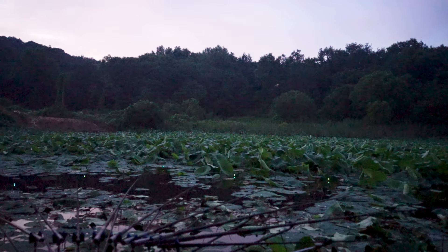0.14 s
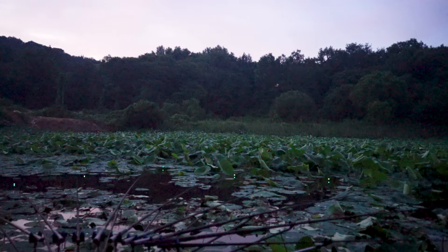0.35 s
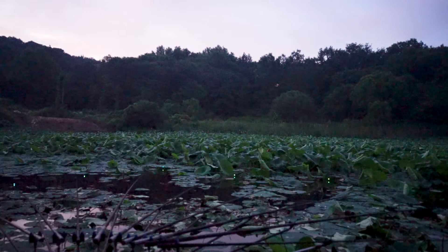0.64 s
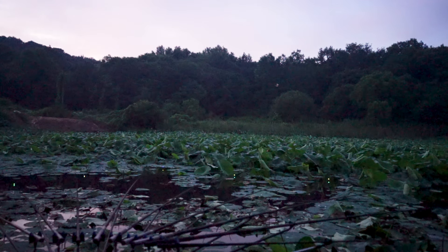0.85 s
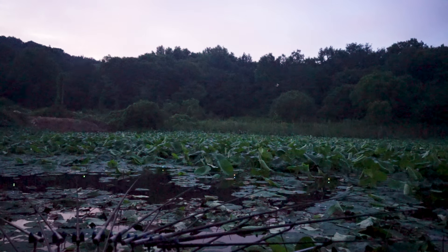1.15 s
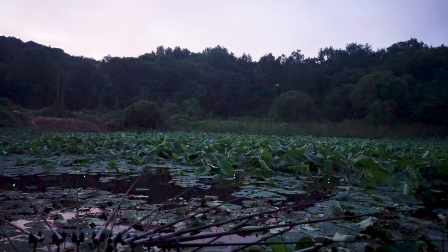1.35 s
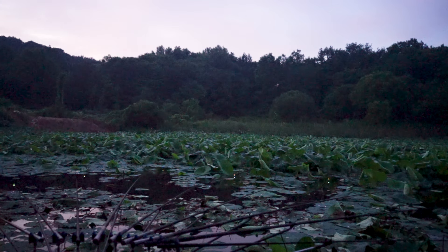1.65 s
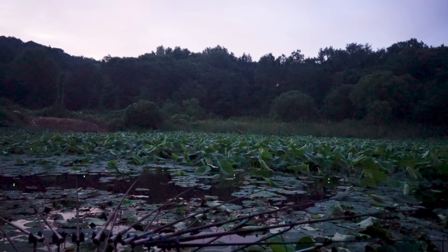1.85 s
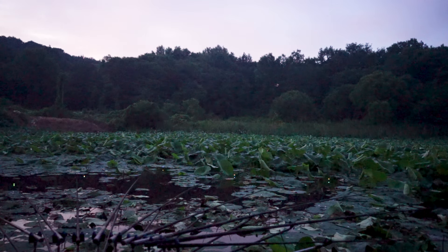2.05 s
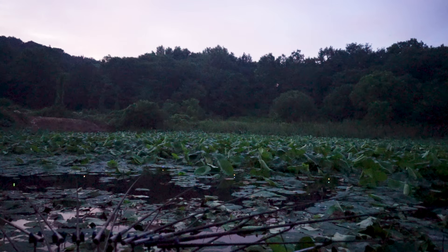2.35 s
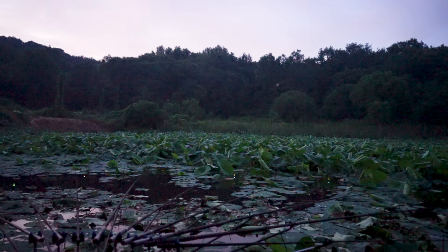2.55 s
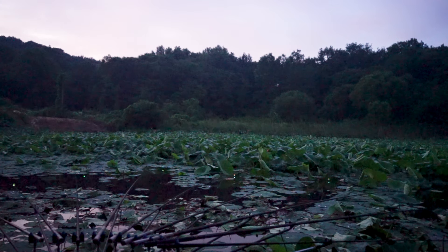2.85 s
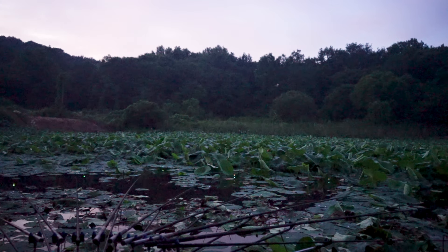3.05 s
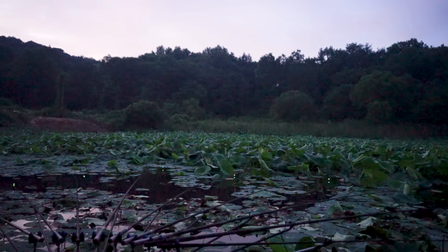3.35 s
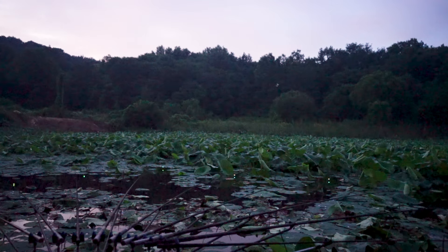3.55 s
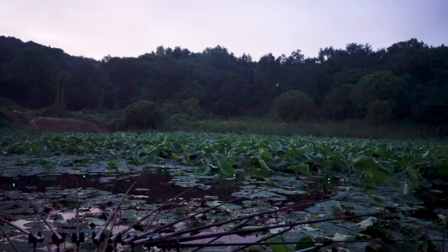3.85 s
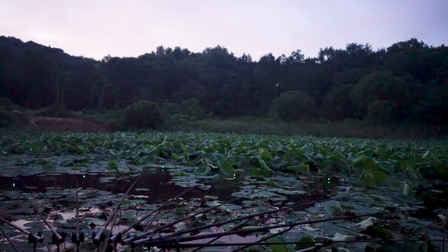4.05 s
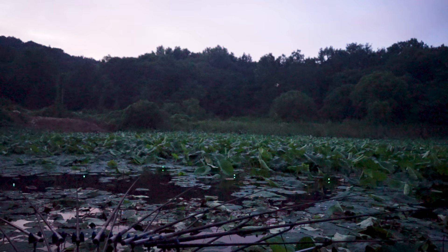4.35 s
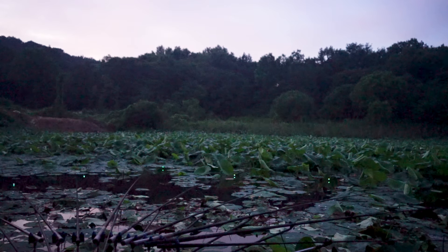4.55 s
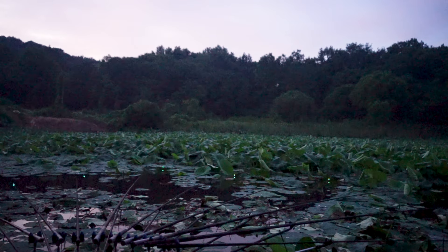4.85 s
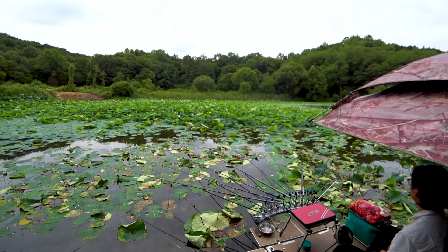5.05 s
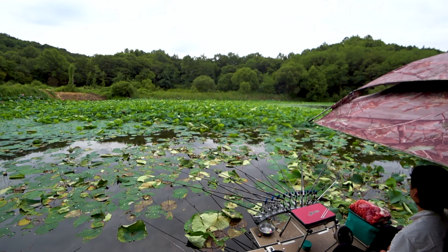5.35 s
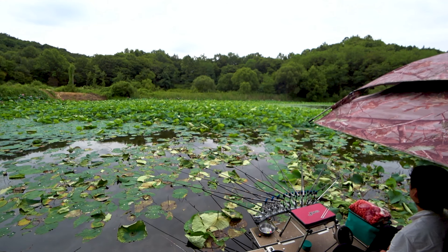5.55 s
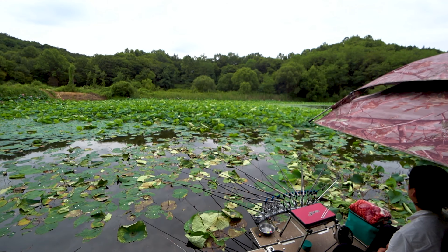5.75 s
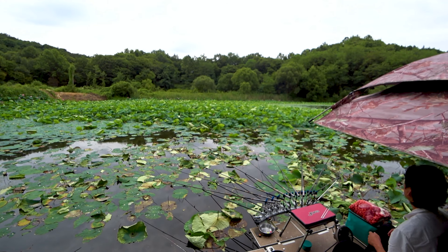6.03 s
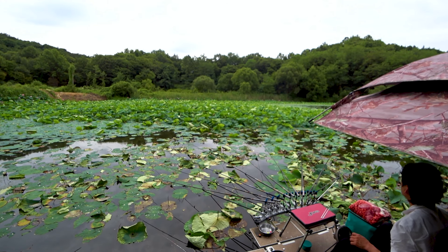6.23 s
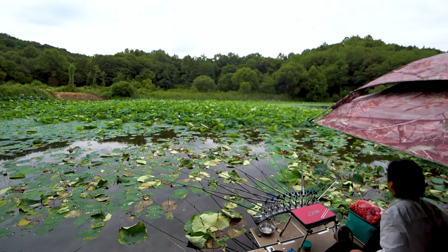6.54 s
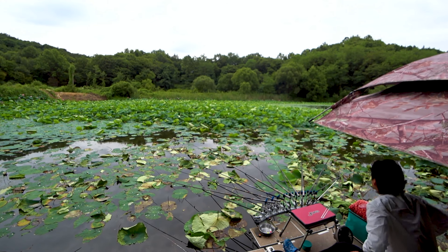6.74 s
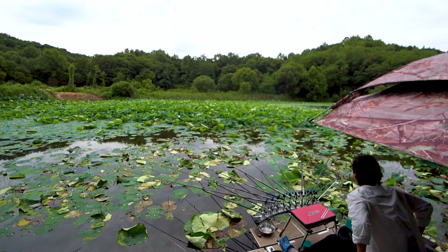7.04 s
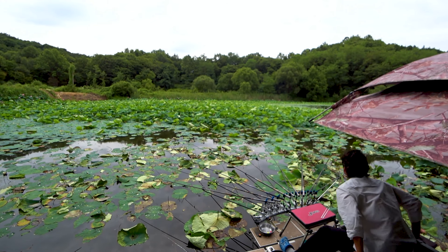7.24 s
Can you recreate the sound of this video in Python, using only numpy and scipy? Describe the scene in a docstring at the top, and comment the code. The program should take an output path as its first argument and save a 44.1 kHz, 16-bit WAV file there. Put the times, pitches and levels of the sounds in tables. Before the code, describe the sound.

Small songbirds chirp, whistle and trill around a quiet pond over faint outdoor air, with a few light ticks and clacks.

```python
"""A lotus pond ringed by woods, at dawn. A near songbird sings a chip, a slur and two falling notes,
twice, then two soft sighs; a second answers with a thin two-voiced trill and squeaks; others whistle
far off. Each note is a gliding tone from a trembling syrinx membrane, scattered by banks and trees.
Beneath lie faint air, a far motor, crickets, small ticks, plops and the clack of fishing tackle."""
import sys
import numpy as np
from scipy import signal
from scipy.fft import rfft, irfft, next_fast_len
from scipy.io import wavfile
from scipy.ndimage import uniform_filter1d

SR = 44100
rng = np.random.default_rng(int(sys.argv[2]) if len(sys.argv) > 2 else 0)


def unload_audio(sound):
    """Save the sound as a 16-bit wav file, at the path given as the first command line argument."""
    columns = np.transpose(np.atleast_2d(sound))
    # keep every value between -1 and 1, then stretch to whole-number steps
    steps = np.round(np.clip(columns, -1, 1) * 32767)
    wavfile.write(sys.argv[1], SR, steps.astype(np.int16))


N = 325899

# note shapes of the distant birds
ARCH_NOTE = dict(length_s=0.14, from_hz=3200, top_hz=6240, to_hz=3900, top_s=.108, attack_s=0.022, release_s=0.022)
DROOP_NOTE = dict(length_s=.145, from_hz=3300, to_hz=2502, bend=2.3, attack_s=0.047, release_s=0.045)
# partials of a plain whistle and of a squeak: multiple, level_db
PURE_TONE = [(1, 0)]
SQUEAK_TONE = [(1, -1.5), (2, -13.5), (3, -16)]


def from_db(db):
    """Decibels to gain."""
    return 10 ** (np.asarray(db) / 20)


def unit_rms(x):
    """Scale to rms 1."""
    return x / np.sqrt(np.mean(x ** 2) + 1e-20)


def panned(x, pan_db):
    """Left louder than right by pan_db."""
    return x * from_db([[pan_db / 2], [-pan_db / 2]])


def add(out, x, start_s):
    """Mix stereo x into out."""
    at = round(start_s * SR)
    x = x[:, max(-at, 0):N - at]
    out[:, max(at, 0):max(at, 0) + x.shape[1]] += x


def at_hz(points, hz):
    """Read a table on a log-frequency axis."""
    points_hz, values = np.transpose(points)
    return np.interp(np.log(hz + 1), np.log(points_hz), values)


def wander(size, rate_hz):
    """Random motion, spread near 1."""
    at = np.arange(size) * rate_hz / SR
    return np.interp(at, np.arange(4000), rng.standard_normal(4000))


def coloured(spectrum, size):
    """Stereo noise of a given spectrum, more alike between the ears in the bass; rms 1."""
    # left-right likeness: freq_hz, correlation
    likeness = [(60, 0.8), (150, 0.48), (380, 0.38), (950, 0.58), (2380, -0.27), (5980, 0.16),
                (15000, 0.14)]
    hz = np.arange(size // 2 + 1) * SR / size
    alike = np.clip(at_hz(likeness, hz), 0, 1)
    mid, side = rfft(rng.standard_normal((2, size)))
    skirts = np.minimum(hz / spectrum[0][0], 1) ** 2 / np.maximum(hz / spectrum[-1][0], 1) ** 2
    ears = np.sqrt(1 + alike) * mid + np.sqrt(1 - alike) * side * [[1], [-1]]
    return unit_rms(irfft(ears * from_db(at_hz(spectrum, hz)) * skirts, size))


def phase_of(hz, rough):
    """Phase of a tone whose pitch trembles by the fraction rough."""
    return 2 * np.pi * np.cumsum(hz * (1 + rough * wander(len(hz), rate_hz=700))) / SR


def rough_sine(size, hz, rough):
    """Sine trembling about one pitch."""
    return np.sin(phase_of(np.full(size, hz), rough))


def envelope(db):
    """Gain of a sine at this rms level, tapered at both ends."""
    return np.sqrt(2) * from_db(db) * signal.windows.tukey(len(db), .06)


def swell_db(t, attack_s, release_s, edge_db=-16.5):
    """Note level: attack, hold, release."""
    return edge_db * (np.maximum(1 - t / attack_s, 0) + np.maximum(1 - (t[-1] - t) / release_s, 0))


def glide(length_s, from_hz, to_hz, bend, attack_s, release_s):
    """Note sliding early (bend > 0) or late (bend < 0); rows: time_s, pitch_hz, level_db."""
    t = np.arange(0, length_s, 1 / 2000)
    way = np.expm1(-bend * t / length_s) / np.expm1(-bend)
    return np.column_stack([t, from_hz + (to_hz - from_hz) * way, swell_db(t, attack_s, release_s)])


def arch(length_s, from_hz, top_hz, to_hz, top_s, attack_s, release_s):
    """Note climbing over a rounded top; rows: time_s, pitch_hz, level_db."""
    t = np.arange(0, length_s, 1 / 2000)
    sag = np.where(t < top_s, (top_hz - from_hz) / top_s ** 2, (top_hz - to_hz) / (length_s - top_s) ** 2)
    return np.column_stack([t, top_hz - sag * (t - top_s) ** 2, swell_db(t, attack_s, release_s)])


def zigzag(note, swing, rate_hz, crest_s):
    """Swing a note's pitch quickly up and down."""
    t, hz, db = note.T
    return np.column_stack([t, hz * (1 + swing * np.cos(2 * np.pi * rate_hz * (t - crest_s))), db])


def strokes(rows, bend, attack_s, release_s):
    """Several glides joined into one note."""
    return np.vstack([glide(length_s, from_hz, to_hz, bend, attack_s, release_s) + [start_s, 0, db]
                      for start_s, length_s, from_hz, to_hz, db in rows])


def gesture(note, stretch):
    """A stretched note's time axis and smoothed pitch and level curves."""
    times_s, *curves = np.transpose(note)
    times_s = np.maximum.accumulate(times_s) * stretch
    t = np.arange(int(times_s[-1] * SR)) / SR
    return [t] + [uniform_filter1d(np.interp(t, times_s, curve), size=130) for curve in curves]


def sing(note, calls, partials, rough, warble=0, warble_hz=0, beak_hz=13000):
    """One gliding tone per call, with optional warble; the beak dulls the highest partials."""
    out = np.zeros((2, N))
    for start_s, level_db, pitch_ratio, stretch, pan_db in calls:
        t, hz, db = gesture(note, stretch)
        hz = hz * pitch_ratio * (1 + warble * np.sin(2 * np.pi * warble_hz * t))
        phase = phase_of(hz, rough)
        tone = sum(from_db(k_db) * np.sin(k * phase) / (1 + (k * hz / beak_hz) ** 10)
                   for k, k_db in partials)
        add(out, panned(tone * envelope(db + level_db), pan_db), start_s)
    return out


def pond(x, direct_db, echo_db, leaves_db, leaves_t60_s, woods_db, woods_t60_s, ahead=False):
    """Direct sound from the left or ahead, echoes, quick leaf scatter and a longer tail from the woods."""
    # echoes off bank and shelter: delay_s, level_db
    left_echoes = [(.0113, -3), (.0262, -15), (.0431, -21.5), (.0705, -18)]
    right_echoes = [(.0087, -3.5), (.0208, -7.5), (0.0366, -25.5), (0.0623, -16.5)]
    t = np.arange(int(1.5 * SR)) / SR
    response = np.zeros((2, len(t)))
    onset = 1 - np.exp(-t / 0.0064)
    for level_db, t60_s in ((leaves_db, leaves_t60_s), (woods_db, woods_t60_s)):
        tail = rng.standard_normal(response.shape) * from_db(-60 * t / t60_s) * onset
        response += from_db(level_db) * unit_rms(tail) / np.sqrt(len(t))
    right_lag_samples = 0 if ahead else 6
    response[[0, 1], [0, right_lag_samples]] += from_db(direct_db)
    for ear, echoes in enumerate((left_echoes, right_echoes)):
        for delay_s, db in echoes:
            response[ear, int(delay_s * SR)] += from_db(db + echo_db)
    return signal.fftconvolve(x, response, axes=1)[:, :N]


def background():
    """Rumble, a far motor's hum, low air and a high hiss grow fainter while a distant rush swells."""
    # noise spectra: freq_hz, density_db
    rumble_spectrum = [(25, -26), (40, -12), (60, -10), (80, -4), (95, -1.5), (130, -2.5), (170, -33)]
    air_spectrum = [(76, -37), (130, -1), (248, -2.5), (285, -0.5), (322, -1.5), (502, -3), (591, -2),
                    (662, -4), (900, -18), (1170, -56), (1980, -120)]
    rush_spectrum = [(240, -57), (400, -11), (486, -12), (615, -10.5), (753, -2.5), (927, -1.5),
                     (1520, -6.5), (1900, -8.5), (2470, -34), (4180, -120)]
    hiss_spectrum = [(940, -29), (1600, -7), (1800, -6), (2290, 4), (3110, 1), (4030, -3.5), (4490, -3),
                     (4990, 0), (5180, -3.5), (7260, -6), (8000, -12.5), (12500, -13.5), (15100, -18),
                     (16000, -18)]
    # starting levels, and falls in dB per second
    bed = dict(rumble_db=-63.5, rumble_fall_db=2.0, hum_db=-69, hum_fall_db=0.86, air_db=-56.5, air_fall_db=1.53, hiss_db=-46, hiss_fall_db=1.7)
    # swell of the rush: time_s, level_db
    rush_swell = [(0.0, -62.5), (2.59, -63), (5.7, -59), (7.16, -55), (7.39, -54.5)]
    t = np.arange(N) / SR
    rumble, air, rush, hiss = [coloured(spectrum, next_fast_len(N))[:, :N] for spectrum in
                               (rumble_spectrum, air_spectrum, rush_spectrum, hiss_spectrum)]
    hum_db = bed["hum_db"] - bed["hum_fall_db"] * t + 0.52 * wander(N, rate_hz=4)
    hum = from_db(hum_db) * rough_sine(N, hz=95, rough=0.0603)
    rumble *= from_db(bed["rumble_db"] - bed["rumble_fall_db"] * t)
    air *= from_db(bed["air_db"] - bed["air_fall_db"] * t)
    rush *= from_db(np.interp(t, *np.transpose(rush_swell)) + 2.5)
    hiss *= from_db(bed["hiss_db"] - bed["hiss_fall_db"] * t + 0.67 * wander(N, rate_hz=8.5))
    return panned(rumble + hum, 3.2) + panned(air, 1.3) + panned(rush, -1.6) + panned(hiss, 1.0)


def crickets(pitch_hz=4950, pulse_hz=26.3, level_db=-53, fade_db=16, buzz_hz=11300, buzz_s=.1):
    """A far cricket pulses and fades; a bush cricket gives short thin buzzes."""
    # bush cricket: start_s, level_db
    buzzes = [(5.419, -80), (5.85, -68), (6.389, -65)]
    pulses = (.5 + .5 * rough_sine(N, pulse_hz, rough=0.26)) ** 2
    pulses *= from_db(level_db - fade_db * (np.arange(N) / N) ** 2)
    out = np.array([pulses * rough_sine(N, pitch_hz, rough=0.029) for ear in range(2)])
    size = int(buzz_s * SR)
    for start_s, db in buzzes:
        buzz = np.array([rough_sine(size, buzz_hz, rough=0.0126) for ear in range(2)])
        add(out, buzz * envelope(np.full(size, db)), start_s)
    return out


def knocks(events, spectrum, t60_s, gain_db, tail_db, tail_t60_s, attack_s=0.00042):
    """Short noise bursts, each with a faint tail."""
    out, t = np.zeros((2, N)), np.arange(SR // 4) / SR
    decay = from_db(-60 * t / t60_s) + from_db(tail_db - 60 * t / tail_t60_s)
    onset = 1 - np.exp(-(t / attack_s) ** 2)
    for start_s, db in events:
        add(out, coloured(spectrum, len(t)) * onset * decay * from_db(db + gain_db), start_s)
    return out


def ticks():
    """Small, bright, dry ticks to the left."""
    # start_s, level_db
    hits = [(1.512, -21), (1.6666, -32), (1.8576, -21.5), (2.139, -20.5), (2.282, -32.5), (2.4688, -22.5),
            (2.568, -33), (2.7425, -22.5), (2.8452, -33.5)]
    # freq_hz, density_db
    spectrum = [(1500, -5), (3000, 6), (6000, -7), (9000, 8.5), (13000, 5.5), (16000, -13)]
    out = knocks(hits, spectrum, t60_s=0.012, gain_db=1.5, tail_db=-21, tail_t60_s=0.12, attack_s=0.0013)
    return panned(out, pan_db=5.5)


def tackle():
    """Light clacks of fishing tackle."""
    # start_s, level_db
    hits = [(5.9299, -45), (6.6548, -47.5), (6.7406, -49), (6.9232, -44), (6.9473, -46.5), (7.013, -42),
            (7.063, -49.5), (7.1174, -42), (7.2851, -46)]
    # freq_hz, density_db
    spectrum = [(300, -5.5), (1500, 7.5), (4000, 5), (6000, 0), (11000, -5), (16000, -18)]
    return knocks(hits, spectrum, t60_s=0.036, gain_db=3, tail_db=-6.5, tail_t60_s=0.23)


def plops():
    """Soft, dull plops."""
    # start_s, level_db
    hits = [(1.286, -44.5), (1.305, -50), (7.288, -46)]
    # freq_hz, density_db
    spectrum = [(200, -33), (480, 4.5), (800, -2), (1600, -4.5), (3000, -12)]
    return knocks(hits, spectrum, t60_s=0.052, gain_db=5.5, tail_db=-8.5, tail_t60_s=0.15)


def seat_creak():
    """A seat creaks once: a low, rough, falling tone."""
    creak = dict(length_s=0.113, from_hz=480, to_hz=254, bend=1.27, attack_s=0.022, release_s=0.075)
    # start_s, level_db, pitch_ratio, stretch, pan_db
    creaks = [(7.287, -58, .95, .94, 0)]
    return sing(glide(**creak), creaks, SQUEAK_TONE, rough=0.053)


def chorus(note, pitch_ratios, stretches, level_db, spread_db, fade_db, count):
    """Birds in the woods repeat a note at chance times, slowly growing fainter."""
    jitter, loud, pitch, length, side = rng.random((count, 5)).T
    progress = (np.arange(count) + jitter) / count
    calls = np.column_stack([progress * N / SR - .1,
                             level_db + spread_db * (loud - .5) - fade_db * progress,
                             np.interp(pitch, (0, 1), pitch_ratios),
                             np.interp(length, (0, 1), stretches),
                             6 * (side - .5)])
    return sing(note, calls, PURE_TONE, rough=0.011)


def deep_birds():
    """Many short droops and low arches from deep in the woods."""
    return (chorus(glide(**DROOP_NOTE), pitch_ratios=(.72, 1.1), stretches=(.3, .7),
                   level_db=-52, spread_db=8, fade_db=6, count=70)
            + chorus(arch(**ARCH_NOTE), pitch_ratios=(.36, .7), stretches=(.3, .7),
                     level_db=-56, spread_db=8, fade_db=7, count=60))


def perch(rows, pan_db):
    """Calls from one spot; pitch_ratio and stretch default to 1."""
    return [(*row, 1, 1)[:4] + (pan_db,) for row in rows]


def far_birds():
    """Clear whistles from across the pond, with fainter arches and peeps between them."""
    peep = dict(length_s=0.0863, from_hz=3330, top_hz=3707, to_hz=3420, top_s=0.0598, attack_s=0.036, release_s=0.019)
    # start_s, level_db
    peeps = [(.47, -44.5), (.78, -44), (1.53, -52.5), (2.17, -45.5), (2.495, -46), (2.612, -50),
             (4.47, -51.5), (4.557, -52.5), (5.165, -52), (5.47, -53)]
    # start_s, level_db, pitch_ratio
    arches = [(-.03, -52.5, 1.03), (.14, -53, 0.75), (.49, -54, 1.0), (1.04, -52.5, 0.76),
              (1.38, -54.5, 1.05), (3.08, -55.5, 0.99), (3.35, -55.5, 1.09), (4.035, -59.5, 1.05),
              (4.39, -61, 1.17), (5.13, -59, .97), (5.715, -59.5, 0.73), (6.05, -65.5, .96)]
    # start_s, level_db, pitch_ratio, stretch
    droops = [(2.005, -41.5, 0.93, 1.14), (2.38, -42.5, 0.84, 0.5), (2.6, -58, .74, 0.45),
              (4.875, -51, 1.27, 0.56), (4.92, -50.5, 1.056, 1.18), (5.27, -51.5, 0.82, .85),
              (5.645, -56, 1.08, 0.85), (6.07, -58, 1.06, 0.89), (6.27, -59.5, 0.75, 1.1)]
    return (sing(arch(**ARCH_NOTE), perch(arches, pan_db=3), PURE_TONE, rough=0.01)
            + sing(arch(**peep), perch(peeps, pan_db=6), PURE_TONE, rough=0.0034)
            + sing(glide(**DROOP_NOTE), perch(droops, pan_db=1), PURE_TONE, rough=0.015)
            + chorus(arch(**ARCH_NOTE), pitch_ratios=(1, 1.2), stretches=(.85, 1.15),
                     level_db=-62, spread_db=4, fade_db=9, count=9)
            + chorus(arch(**peep), pitch_ratios=(.95, 1.02), stretches=(.85, 1.15),
                     level_db=-53, spread_db=4, fade_db=14, count=7))


def trills(throb_hz=17.13, throb_db=8, rasp_hz=259, fade_db_per_s=23):
    """Both sides of the syrinx sound at once in five throbs; a growing flutter makes them rasp."""
    low_voice = dict(length_s=.3, from_hz=6620, to_hz=5266, bend=-1.8, attack_s=0.0018, release_s=0.014)
    # start_s, level_db, pitch_ratio, stretch, pan_db
    calls = [(1.083, -28.5, 1, 0.94, 1), (4.637, -35.5, .99, 0.92, 1)]
    out = np.zeros((2, N))
    for start_s, level_db, pitch_ratio, stretch, pan_db in calls:
        t, low_hz, db = gesture(glide(**low_voice), stretch)
        high_hz = np.linspace(8350, 6730, len(t))
        flutter = rough_sine(len(t), rasp_hz, rough=0.26) * (0.72 + 0.34 * t / t[-1])
        low = phase_of(low_hz * pitch_ratio * (1 + 0.031 * flutter), rough=0.0151)
        high = phase_of(high_hz * pitch_ratio * (1 + 0.061 * flutter), rough=0.0151)
        # the voices couple into octave and sum tones
        coupled = np.sin(2 * low) + 0.5 * np.sin(low + high) + 0.46 * np.sin(2 * high)
        tone = np.sin(low) + from_db(-6) * np.sin(high) + from_db(-15) * coupled
        throb = -throb_db * np.sqrt(t / t[-1]) * np.cos(2 * np.pi * throb_hz * t)
        add(out, panned(tone * envelope(db + level_db + throb - fade_db_per_s * t), pan_db), start_s)
    return out


def answering_bird():
    """A thin, high voice: trills, squeaks, buzzing swoops, wheezes and pips."""
    squeak = dict(length_s=.095, from_hz=8300, to_hz=5760, bend=2.5, attack_s=0.069, release_s=.01)
    swoop = dict(length_s=.175, from_hz=6350, to_hz=3014, bend=2.8, attack_s=0.016, release_s=0.043)
    wheeze = dict(length_s=.15, from_hz=5600, to_hz=7140, bend=1.4, attack_s=0.038, release_s=.006)
    pip = dict(length_s=0.0393, from_hz=6690, to_hz=5020, bend=5.76, attack_s=0.005, release_s=0.026)
    # calls: start_s, level_db, pitch_ratio, stretch, pan_db
    squeaks = [(1.678, -27, 1, 0.89, 1), (2.69, -46.5, 1, 1.9, .8), (3.133, -47.5, .89, 1.2, 0)]
    swoops = [(1.819, -34, 1, 1, 2.7), (2.71, -44.5, 1.42, 0.71, 1)]
    wheezes = [(2.054, -37, 1, .93, 2.2), (2.057, -39, .655, .62, 4.7)]
    pips = [(2.713, -41.5, 0.9, 1, 1), (2.775, -39, .8, 1.3, 1), (2.825, -39.5, .84, 1.4, 1),
            (5.643, -46.5, 0.99, 0.69, 0)]
    squeak_note = zigzag(glide(**squeak), swing=0.111, rate_hz=37, crest_s=0.021)
    return (trills()
            + sing(squeak_note, squeaks, SQUEAK_TONE, rough=0.0358, beak_hz=15200)
            + sing(glide(**swoop), swoops, SQUEAK_TONE, rough=0.044, warble=0.153, warble_hz=56.6)
            + sing(glide(**wheeze), wheezes, SQUEAK_TONE, rough=0.0373)
            + sing(glide(**pip), pips, PURE_TONE, rough=0.048))


def after(calls, delay_s, gain_db=0):
    """A follow-up to each call, at pitch_ratio 1."""
    return [(start_s + delay_s, db + gain_db, 1, stretch, pan_db)
            for start_s, db, _, stretch, pan_db in calls]


def near_bird():
    """Zigzag chip, pure slur and two falling notes; later two sighs, each with a rough drop and a hook."""
    chip = dict(length_s=.074, from_hz=3700, to_hz=2660, bend=3, attack_s=0.0031, release_s=0.023)
    slur = dict(length_s=.12, from_hz=2680, to_hz=2316, bend=0.88, attack_s=0.03, release_s=0.031)
    sigh = dict(length_s=0.11, from_hz=2915, to_hz=2552, bend=0.08, attack_s=0.051, release_s=.033)
    drop = dict(length_s=0.042, from_hz=2400, to_hz=1870, bend=2.34, attack_s=.004, release_s=0.011)
    hook = dict(length_s=0.093, from_hz=2020, top_hz=2242, to_hz=1850, top_s=.04, attack_s=0.044, release_s=0.039)
    # down-strokes of a falling note: start_s, length_s, from_hz, to_hz, level_db
    fall_strokes = [(0, .013, 3808, 2322, -2), (.02, 0.032, 3169, 3036, 0.5), (.05, .036, 2665, 2034, -0.5),
                    (.089, .016, 2650, 1970, -4.5), (.111, .028, 2460, 1921, -5.5)]
    # calls: start_s, level_db, pitch_ratio, stretch, pan_db
    chips = [(-.01, -24, 1, 0.98, 6.5), (3.501, -25.5, 0.96, .92, 5.5)]
    slurs = [(.123, -18, 0.98, 1, 3.6), (3.631, -20, 1, 0.97, 4.2)]
    falls = [(0.398, -16.5, 1, 0.98, 4.1), (.722, -16.5, 1, 0.94, 3.9), (3.924, -21.5, 1, 0.95, 4.4),
             (4.258, -21.5, 1, 0.95, 2.6)]
    sighs = [(6.689, -32.5, 0.97, 1, 3.3), (7.111, -34.5, 0.97, 0.93, 5.8)]
    # multiple, level_db
    partials = [(1, 0.5), (2, -31), (3, -39.5), (4, -29.5), (5, -24.5), (6, -46)]
    chip_note = zigzag(glide(**chip), swing=0.1764, rate_hz=39, crest_s=.008)
    fall_note = strokes(fall_strokes, bend=1.4, attack_s=0.00091, release_s=0.0061)
    return (sing(chip_note, chips, partials, rough=0.041)
            + sing(glide(**slur), slurs, partials, rough=0.00082)
            + sing(fall_note, falls, partials, rough=0.015)
            + sing(glide(**sigh), sighs, partials, rough=0.0056, beak_hz=12500)
            + sing(glide(**drop), after(sighs, delay_s=.09, gain_db=-12), PURE_TONE, rough=0.051)
            + sing(arch(**hook), after(sighs, delay_s=.13), partials, rough=0.015, beak_hz=11300))


def scene():
    """Birds at four distances over small knocks, crickets and the background."""
    birds = pond(answering_bird(), direct_db=-7, echo_db=-2, leaves_db=-0.5, leaves_t60_s=0.14,
                 woods_db=-8.5, woods_t60_s=0.48)
    birds += pond(near_bird(), direct_db=-2.5, echo_db=-2, leaves_db=-4.5, leaves_t60_s=0.22,
                  woods_db=-25, woods_t60_s=1.74)
    birds += pond(far_birds(), direct_db=0.5, echo_db=-5, leaves_db=-1, leaves_t60_s=0.14,
                  woods_db=-1.5, woods_t60_s=1.0, ahead=True)
    birds += pond(deep_birds(), direct_db=-2, echo_db=-0.5, leaves_db=-6, leaves_t60_s=0.23,
                  woods_db=-6, woods_t60_s=1.0, ahead=True)
    return birds + ticks() + tackle() + plops() + seat_creak() + crickets() + background()


def record(dry):
    """Steep low-pass at 16 kHz."""
    return signal.sosfilt(signal.ellip(12, .1, 90, 16000, fs=SR, output="sos"), dry)


dry = scene()
out = record(dry)
unload_audio(out)
```